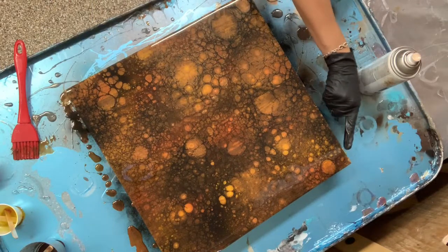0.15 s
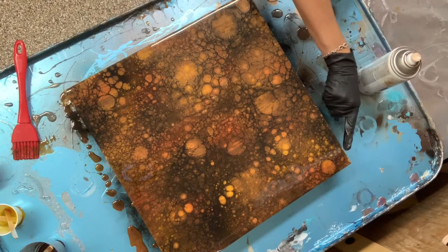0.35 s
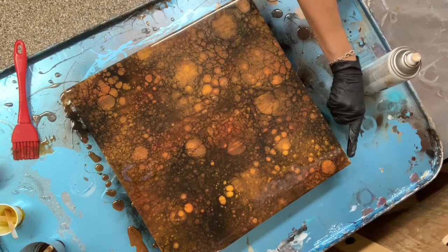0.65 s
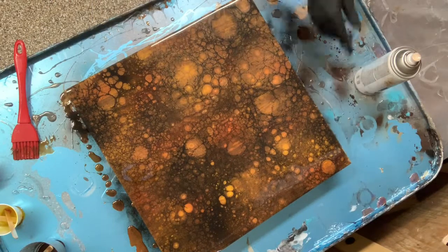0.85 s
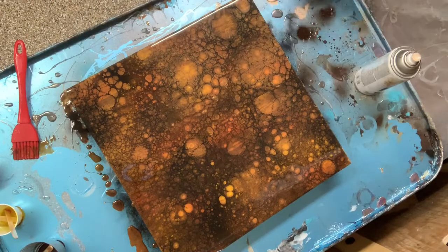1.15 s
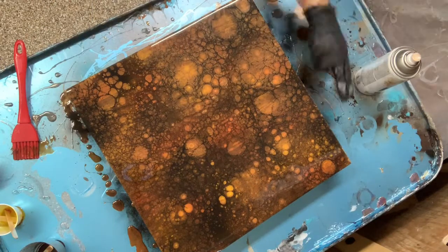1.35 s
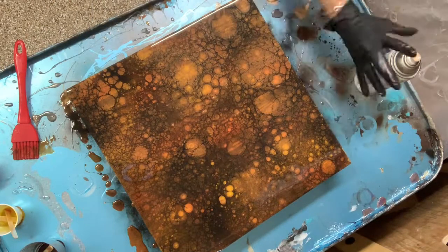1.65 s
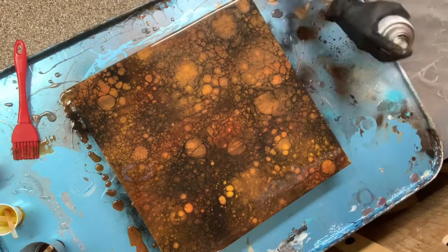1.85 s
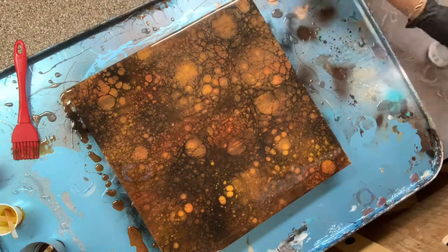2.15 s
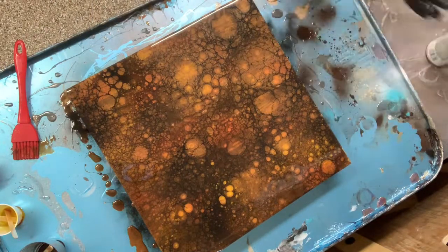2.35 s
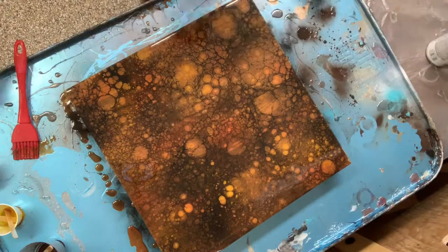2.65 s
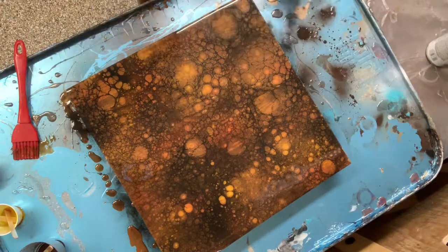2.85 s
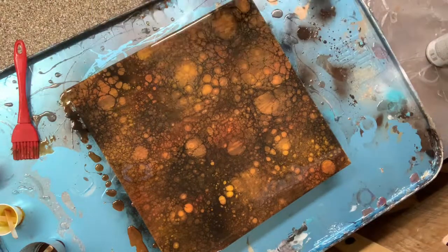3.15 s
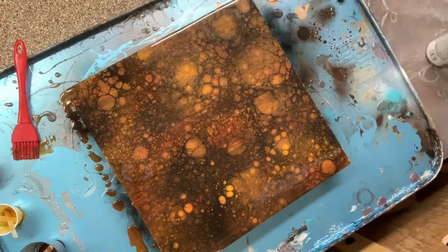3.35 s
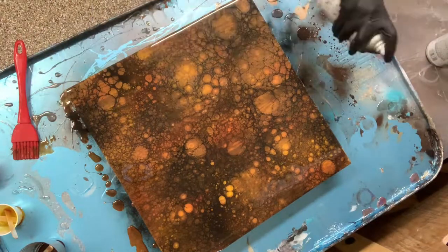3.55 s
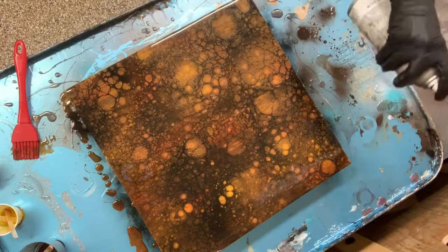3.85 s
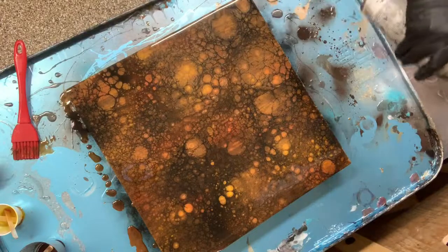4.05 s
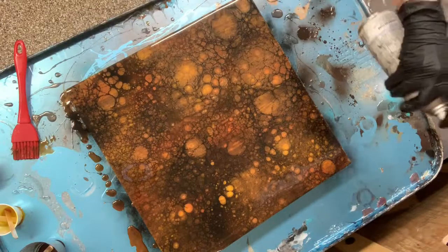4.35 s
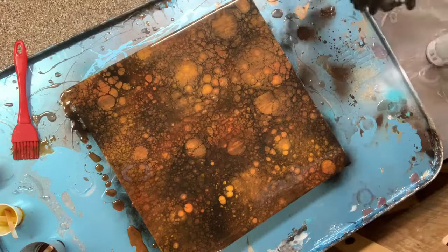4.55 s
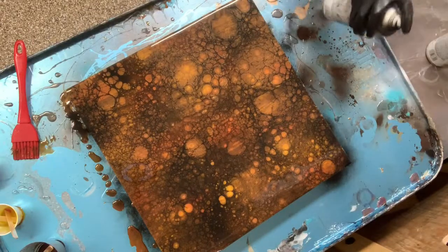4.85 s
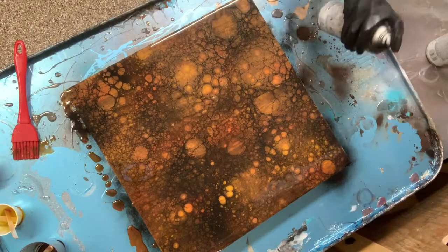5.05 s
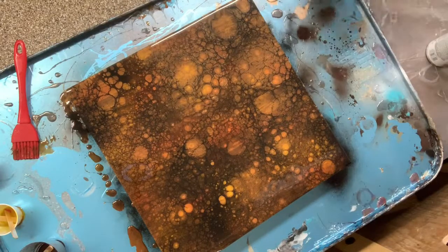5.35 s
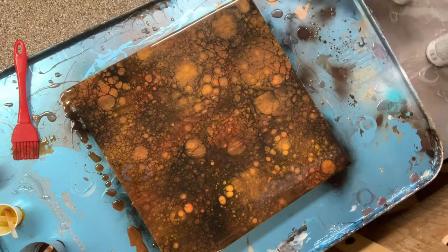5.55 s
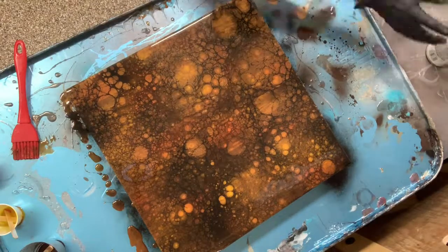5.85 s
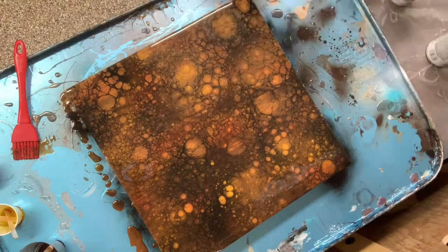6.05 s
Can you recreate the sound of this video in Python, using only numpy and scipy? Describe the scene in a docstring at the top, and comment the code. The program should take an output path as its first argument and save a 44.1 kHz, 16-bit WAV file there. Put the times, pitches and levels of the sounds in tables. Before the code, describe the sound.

Under a deep, slowly beating motor hum, a glove brushes and grabs a metal can, which lands with a muffled hollow triple knock. Light scuffs follow. Then come sputtering, bright aerosol spurts with quick metallic ball ticks at first, settling into evenly spaced puffs. A harder, resonant thunk of can on bench ends the action, with soft bumps afterwards. Near microphones, short diffuse room reverberation.

```python
"""Aerosol cans on a workbench

A gloved hand moves aerosol cans about a plastic paint tray: filtered-noise scuffs, rubs and tray bumps.
One can is grabbed and stood down with a hollow knock of ringing bench modes. Another rattles its mixing
ball (resonant noise bursts), gives a row of hissing puffs (shaped noise) and is stood down hard.
Two beating sines hum low beneath. The right microphone port hears the can a little late.
"""
import sys
import numpy as np
from scipy import signal
from scipy.fft import rfft, irfft, next_fast_len
from scipy.io import wavfile
from scipy.ndimage import map_coordinates

SR = 44100
rng = np.random.default_rng(int(sys.argv[2]) if len(sys.argv) > 2 else 0)


def generate_wav(sig):
    """Save sig (samples, or channels by samples) to the path in sys.argv[1] as 16-bit PCM at SR."""
    pcm = np.round(np.clip(np.atleast_2d(sig).T, -1, 1) * 32767).astype(np.int16)
    wavfile.write(sys.argv[1], SR, pcm)


N = 273861

# Colour tables give relative levels. Likeness: left-right, 0 unrelated to 1 identical.

# valve presses, weak ones only dribble: open [s], hold [s], jet_level [dB], mist_level [dB]
PUFFS = [(3.226, .008, -49.5, -55.5), (3.262, 0.15, -62.5, -55.5), (3.403, 0.0063, -41.5, -43.5),
         (3.436, 0.1, -54.5, -54), (3.592, 0.028, -46.5, -50), (3.752, 0.042, -43.5, -51.5),
         (3.836, 0.016, -65, -57), (3.993, 0.056, -43, -49.5), (4.09, 0.021, -59.5, -57),
         (4.254, 0.057, -43, -49), (4.45, 0.05, -42.5, -52.5), (4.559, 0.042, -64.5, -58),
         (4.76, 0.05, -42, -53.5), (4.962, 0.033, -42, -53), (5.157, 0.037, -43, -54)]
# nozzle jet colour: freq [Hz], level [dB]
JET_COLOUR = [(1500, -39), (4000, -12), (6500, 2.5), (8500, 2), (11000, 6), (13500, 3), (15800, 2)]
# colour of mist striking the tray: freq [Hz], level [dB]
MIST_COLOUR = [(300, -20), (700, -8.5), (1300, -2.5), (2000, 1), (2700, 2.5), (3300, 0), (4500, 1.5),
               (6500, -10.5), (9000, -10), (15000, -57)]
# hiss bouncing off tray and canvas: nominal_delay [s], level [dB]
TRAY_ECHOES = [(.0021, -12), (.0036, -11), (.0055, -7.5)]
# lag of the right port behind the left: freq [Hz], lag [s]
PORT_LAG = [(1000, .0001), (3500, .00029), (5700, .000351), (8200, .000366), (10700, .000374),
            (13150, .00038), (15600, .000385)]
# mixing ball strikes: time [s], relative_level [dB]
BALL_HITS = [(3.228, -33.5), (3.2644, -34.5), (3.2829, -32), (3.3977, -31.5), (3.4078, -26), (3.445, -26),
             (3.4555, -29), (3.4694, -30), (3.5018, -36), (3.5768, -36), (3.8144, -31.5)]
# steel wall resonances: freq [Hz], width [Hz], level [dB]
CAN_MODES = [(1050, 170, -10.5), (2180, 200, -7.5), (2580, 110, -4), (3700, 180, -4), (4320, 180, 1),
             (4460, 97, 5.5), (6540, 320, 2), (7200, 71, -13), (8250, 700, -7), (10350, 300, -2),
             (10100, 390, -25), (13400, 400, -18)]
# can meets bench: time [s], blow_level [dB], rim [0 flat, 1 rim], bright [Hz], crack_level re blow [dB]
KNOCKS = [(2.258, -25, .15, 900, -20.5), (2.269, -26, 0.39, 930, -13), (2.281, -25, 0.46, 784, -27),
          (2.330, -35.5, 0.04, 790, -25), (2.353, -37.5, 0.51, 820, -32), (5.6248, -23, .05, 1250, -24),
          (5.631, -18, 0.22, 1450, -25.5), (5.6353, -14, 0.61, 1500, -19.5),
          (5.655, -26.5, 0.95, 1450, -19), (5.727, -39, .45, 1440, -33.5)]
# bench and tray ringing together: freq [Hz], level [dB], t60 [s]
BENCH_MODES = [(88, -25, 0.4), (166, -7, 0.082), (181.2, -2.5, 0.27), (262.6, -11.5, 0.19), (284, -11, 0.2),
               (345, -15, 0.15), (377.5, -8.5, 0.25), (448.5, -3.5, 0.3), (476, -6, 0.16), (544, 4, 0.23),
               (620.5, -9.5, 0.3), (732, -17, 0.35), (798, -14.5, 0.17), (810, -10.5, .2),
               (894, -12.5, 0.25), (942, -16, 0.18), (985, -12.5, 0.11), (1050, -11.5, 0.11),
               (1180, -22, 0.18), (1272, -21.5, .24), (1386, -22.5, 0.32)]
# dull thud colour: freq [Hz], level [dB]
THUD_COLOUR = [(50, -24.5), (125, -28), (178, 4), (230, -7.5), (310, -11.5), (450, 3), (700, -5.5),
               (950, -3.5), (1250, -11), (1480, -6.5), (1700, -14), (4000, -12.5)]
# contact crack colour: freq [Hz], level [dB]
CRACK_COLOUR = [(600, 4), (1500, -5), (2300, 4.5), (3000, -7), (4200, 5), (5500, -5), (8500, -10.5),
                (12000, -16), (15500, -25)]
# rim grazes just before landing: peak_time [s], level [dB], centre [Hz]
GRAZES = [(2.25, -45, 510), (5.612, -35, 804)]
# can nudges tray: time [s], level [dB], fade [s]
BUMPS = [(2.919, -47, 0.4), (2.96, -39.5, 0.21), (5.76, -35, 0.2), (5.825, -32.5, 0.27), (5.888, -40, .28)]
# plastic tray resonances: freq [Hz], width [Hz], level [dB]
TRAY_MODES = [(181, 18, 10), (196, 21, -2.5), (308, 66, -6), (463, 27, -1.5), (486, 160, -14.5)]
# colour of the first grab: freq [Hz], width [Hz], level [dB]
GRAB_MODES = [(1030, 190, 13.5), (2430, 4200, 2), (6030, 8600, -8), (12700, 700, -5)]
# glove and can scuffs: peak_time [s], level [dB], centre [Hz], width [octaves]
SCUFFS = [(1.185, -71.5, 4360, 0.63), (1.30, -75, 3000, 0.66), (1.65, -77, 5360, .074),
          (1.862, -71, 8300, .12), (1.967, -64.5, 6760, 0.43), (2.093, -66.5, 4900, 0.66),
          (2.535, -76, 7960, 0.27), (2.62, -64, 1380, 0.5), (2.67, -78, 8000, .24), (2.941, -67, 5000, 0.8),
          (3.05, -77, 6500, .69), (3.228, -51, 860, 1.26), (5.833, -55.5, 2550, .73),
          (5.868, -54, 1830, 0.69)]
# glove sliding along a can: start [s], hold [s], level [dB]
RUBS = [(0.88, 0.41, -78), (1.468, .12, -79.5), (1.622, 0.075, -74.5), (2.746, 0.038, -63),
        (2.864, 0.39, -77.5), (5.44, 0.12, -70), (6.092, 0.063, -73)]
# glove rub colour: freq [Hz], level [dB]
GLOVE_COLOUR = [(500, -9), (1200, 4.5), (2500, -0.5), (4400, 1), (6000, -7.5), (8000, -19.5),
                (15000, -31.5)]
# workshop reverberation: freq [Hz], t60 [s]
ROOM_T60 = [(150, 0.12), (550, 0.36), (1300, 0.26), (3000, 0.31), (8000, 0.26), (15000, 0.077)]
# humming motors, close in speed: freq [Hz], level [dB]
MOTORS = [(58.68, -41.4), (53.56, -57.5)]
# faint hum overtones: freq [Hz], level [dB], pitch_wander [Hz]
OVERTONES = [(108, -67.5, 3.8), (177.8, -64, 2.932), (236, -67, 3.02), (282.7, -66.5, 3.97),
             (362.6, -68.5, 1.4), (411, -75, 2.4)]
# passing faint tone: start [s], hold [s], level [dB], pitch [Hz], glide [Hz/s]
TONES = [(1.683, 0.425, -60.5, 282.6, 24.8), (3.14, .08, -64, 282, 19)]
# dull room noise colour: freq [Hz], level [dB]
AIR_COLOUR = [(20, -4), (45, 4), (90, 3), (180, -1), (350, -5), (500, -13), (900, -20), (1500, -29.5),
              (2050, -33), (2700, -40), (4200, -38), (5500, -44), (9000, -47), (15000, -46.5)]
# narrow bands in the room noise: freq [Hz], width [Hz], level [dB]
WHINE_MODES = [(504, 40, 11), (989, 56, 3), (2088, 37, -1), (3750, 70, -4.5), (4470, 80, -10),
               (6600, 200, -21), (8400, 330, -16.5)]
# likeness of diffuse sound: freq [Hz], likeness
DIFFUSE_ALIKE = [(60, 1), (130, 0.89), (290, 0.67), (640, 0.36), (1400, 0.45), (3000, 0.27), (15000, 0.11)]
# likeness of each source: freq [Hz], likeness
JET_ALIKE = [(3000, 0.1), (8000, 0.93), (14000, 1.0)]
MIST_ALIKE = [(700, 1.0), (2000, 0.23), (6000, 0.12)]
WALL_ALIKE = [(2000, 0.2), (10000, 0.43)]
THUD_ALIKE = [(100, 1.0), (400, 0.98), (1400, 0.48)]
CRACK_ALIKE = [(2000, 0.11), (9000, 0.92)]
GRAZE_ALIKE = [(1000, 1.0)]
TRAY_ALIKE = [(150, 0.99), (500, 1.0)]
TOUCH_ALIKE = [(1000, 0.74), (4000, 0.14), (9000, 1.0)]

# every rise and fade is the time for 60 dB
JET_RISE_S, JET_FADE_S = 0.075, 0.14
MIST_RISE_S, MIST_FADE_S = 0.097, 0.22
MIST_FLIGHT_S = 0.0028  # nozzle to tray
SAG_DB_PER_S = 23  # pressure drop while the valve is open
VALVE_EASE = 1.1  # above 1 rounds the shoulders of the jet
MIST_PATCHY_DB, MIST_PATCH_HZ = 2, 460  # each puff lands on another spot with its own colour
MIST_SPATTER_DB = 1.2  # droplets arrive in clumps
BALL_RING_S, BALL_DETUNE = 0.23, 0.014  # detune: log pitch scatter
FLAT_RING_DB, RIM_RING_DB = -15, 0.5  # the rim sets the bench ringing
FLAT_BASS_DB, RIM_BASS_DB = 10, -10  # the flat base pushes it
BASS_HZ, BASS_WIDTH_HZ = 195, 57  # bench boom
PUSH_DB, PUSH_S = 6.5, 0.00052  # single shove of a contact, half width
GRAZE_OCTAVES, GRAZE_RISE_S, GRAZE_FADE_S = 0.34, 0.1, 0.1
GRAB_S, GRAB_DB, GRAB_RISE_S, GRAB_FADE_S = 1.803, -47.5, 0.079, 0.24
GRAB_TAP_S, GRAB_TAP_DB = 1.7975, -45  # a fingertip lands first
SCUFF_RISE_S, SCUFF_FADE_S = 0.16, 0.21
RUB_RISE_S, RUB_FADE_S = 0.44, 0.5
IN_STEP_S = 0.152  # the two motors swell together
HUM_WAVER_DB, HUM_WANDER_HZ = -0.06, 0.6
TONE_RISE_S, TONE_FADE_S = 1, 1.2
TOP_HZ = 15780


def amp(db):
    """Decibels to gain."""
    return 10 ** (np.asarray(db) / 20)


def unit(x):
    """x at rms 1."""
    return x / np.sqrt(np.mean(x ** 2) + 1e-20)


def along(points, hz):
    """(Hz, value) points interpolated on a log frequency axis."""
    f, v = np.transpose(points)
    return np.interp(np.log(hz + 1), np.log(f + 1), v)


def wobble(rate_hz):
    """Smooth random curve, rate_hz knots a second."""
    knots = rng.standard_normal(int(N * rate_hz / SR) + 4)
    return map_coordinates(knots, [np.arange(N) * rate_hz / SR])


def filtered(x, response):
    """x times a response of frequency."""
    n = x.shape[-1]
    m = next_fast_len(n + 8192)
    return irfft(rfft(x, m) * response(np.fft.rfftfreq(m, 1 / SR)), m)[..., :n]


def noise(colour, alike, size=N):
    """Stereo noise of rms 1; colour gives dB, alike sets the mid-side balance by frequency."""
    def mid_side(hz):
        turn = np.arccos(np.clip(along(alike, hz), -1, 1)) / 2
        return amp(colour(hz)) * [np.cos(turn), np.sin(turn)]

    mid, side = filtered(rng.standard_normal((2, size)), mid_side)
    return unit(np.array([mid + side, mid - side]))


def shaped(points):
    """Colour of a (Hz, dB) table."""
    return lambda hz: along(points, hz)


def peaked(modes):
    """Colour of (Hz, width Hz, dB) resonances with steep skirts."""
    def colour(hz):
        power = sum(amp(db) ** 2 / (1 + ((hz - centre) / width) ** 2) ** 2 for centre, width, db in modes)
        return 10 * np.log10(power)

    return colour


def band(centre_hz, octaves):
    """Colour of one broad hump."""
    return lambda hz: -10 * np.log10(1 + (np.log2((hz + 1) / centre_hz) / octaves) ** 4)


def patches(depth_db, width_hz):
    """Random, smoothly uneven response of frequency."""
    knots = rng.standard_normal(256)
    return lambda hz: amp(depth_db * map_coordinates(knots, [hz / width_hz], mode="mirror"))


def ports(x):
    """Direct sound reaches the left port first: half the lag as lead left, half as delay right."""
    lead = np.array([[1], [-1]])
    return filtered(x, lambda hz: np.exp(1j * np.pi * hz * along(PORT_LAG, hz) * lead))


def swell(t, rise_s, fade_s):
    """Gain climbing 60 dB in rise_s up to t = 0, then falling 60 dB in fade_s."""
    return amp(-60 * np.maximum(-t / rise_s, t / fade_s))


def held(t, hold_s, rise_s, fade_s, ease=1):
    """Swell with a hold at the top; ease bends its slopes."""
    away = t - np.clip(t, 0, hold_s)
    return amp(-60 * np.abs(np.maximum(-away / rise_s, away / fade_s)) ** ease)


def add(track, start_s, sound):
    """Mix a sound in at start_s."""
    part = track[:, round(start_s * SR):][:, :sound.shape[-1]]
    part += sound[..., :part.shape[-1]]


def spray():
    """Each valve press opens a bright jet; droplets spatter on the tray with a duller rush."""
    out, t = np.zeros((2, N)), np.arange(-SR // 8, SR // 3) / SR
    for open_s, hold_s, jet_db, mist_db in PUFFS:
        pressure = amp(-SAG_DB_PER_S * np.clip(t, 0, hold_s))
        jet = amp(jet_db) * held(t, hold_s, JET_RISE_S, JET_FADE_S, VALVE_EASE)
        jet = jet * noise(shaped(JET_COLOUR), JET_ALIKE, size=len(t))
        mist = amp(mist_db) * held(t - MIST_FLIGHT_S, hold_s, MIST_RISE_S, MIST_FADE_S)
        mist = mist * noise(shaped(MIST_COLOUR), MIST_ALIKE, size=len(t))
        mist = filtered(mist, patches(MIST_PATCHY_DB, MIST_PATCH_HZ))
        mist = mist * amp(MIST_SPATTER_DB * wobble(160)[:len(t)])
        mist = mist * amp([[-0.8], [0.8]])  # leans right
        # the hand moves between puffs, so the echoes comb each one anew
        echoes = [(delay_s * np.exp(0.093 * rng.standard_normal()), db) for delay_s, db in TRAY_ECHOES]
        comb = lambda hz: 1 + sum(amp(db) * np.exp(-2j * np.pi * hz * delay_s) for delay_s, db in echoes)
        add(out, open_s + t[0], filtered(pressure * (jet + mist), comb))
    flicker = amp(0.9 * wobble(600))
    return ports(out * flicker)


def ball():
    """The mixing ball skitters on the steel wall, muffled by paint; each spot rings a little differently."""
    out, t = np.zeros((2, N)), np.arange(-SR // 30, SR // 4) / SR
    for hit_s, hit_db in BALL_HITS:
        modes = []
        for hz, width_hz, db in CAN_MODES:
            spot_hz = hz * np.exp(BALL_DETUNE * rng.standard_normal())
            modes.append((spot_hz, width_hz, db + 3 * rng.standard_normal()))
        tick = 0.9 * swell(t, 0.0035, 0.012) * rng.standard_normal((2, len(t)))
        wall = swell(t, 0.06, BALL_RING_S) * noise(peaked(modes), WALL_ALIKE, size=len(t))
        add(out, hit_s + t[0], amp(hit_db - 14.5) * (wall + tick))
    return ports(out)


def ring(modes, hit_s, t, rise_s, scatter_db, spread):
    """Struck modes, in step from blow to blow, with fresh strengths and a phase of their own at each port."""
    hz, db, t60_s = np.transpose(modes)[:, :, None]
    size = amp(db + scatter_db * rng.standard_normal(hz.shape)) * swell(t, rise_s, t60_s)
    skew = spread * np.sqrt(hz / hz.max()) * rng.standard_normal(hz.shape)
    phase = 2 * np.pi * hz * (hit_s + t)
    return np.array([(size * np.sin(phase + side * skew)).sum(0) for side in (1, -1)])


def knocks():
    """The can's rim grazes, lands and rocks on the hollow bench: modes, shove, thud and crack."""
    out, t = np.zeros((2, N)), np.arange(-SR // 12, SR // 2) / SR
    for hit_s, blow_db, rim, bright_hz, crack_db in KNOCKS:
        ring_db = np.interp(rim, [0, 1], [FLAT_RING_DB, RIM_RING_DB])
        bass_db = np.interp(rim, [0, 1], [FLAT_BASS_DB, RIM_BASS_DB])
        modes = ring(BENCH_MODES, hit_s, t, rise_s=0.063, scatter_db=1.7, spread=0.55)
        modes = amp(ring_db - 2) * modes
        thud = amp(0.5) * noise(shaped(THUD_COLOUR), THUD_ALIKE, size=len(t))
        thud = thud * (swell(t, 0.0032, 0.052) + 0.58 * swell(t, 0.078, 0.29))
        push = amp(PUSH_DB) * (2 * (t / PUSH_S) ** 2 - 1) * np.exp(-(t / PUSH_S) ** 2)

        # a softer landing leaves the high modes quiet; the bass depends on how flat the can lands
        def landing(hz):
            bass = amp(bass_db / (1 + ((hz - BASS_HZ) / BASS_WIDTH_HZ) ** 4))
            return bass / np.sqrt(1 + (hz / bright_hz) ** 10)

        body = filtered(modes + push + thud, landing)
        snap = 1.4 * swell(t, 0.0017, 0.009)
        buzz = 0.42 * swell(t, 0.093, 0.074)
        tail = 0.38 * swell(t, 0.072, 0.34)
        crack = noise(shaped(CRACK_COLOUR), CRACK_ALIKE, size=len(t)) * (snap + buzz + tail)
        add(out, hit_s + t[0], amp(blow_db) * (body + amp(crack_db - 5) * ports(crack)))
    for peak_s, db, centre_hz in GRAZES:
        scrape = noise(band(centre_hz, GRAZE_OCTAVES), GRAZE_ALIKE, size=len(t))
        add(out, peak_s + t[0], amp(db) * swell(t, GRAZE_RISE_S, GRAZE_FADE_S) * scrape)
    return out * amp([[-0.7], [0.7]])  # leans right


def bumps():
    """The plastic tray judders softly in its low resonances."""
    out, t = np.zeros((2, N)), np.arange(-SR // 30, SR // 3) / SR
    for bump_s, db, fade_s in BUMPS:
        judder = noise(peaked(TRAY_MODES), TRAY_ALIKE, size=len(t))
        add(out, bump_s + t[0], amp(db) * swell(t, 0.026, fade_s) * judder)
    return out


def handling():
    """The glove grabs the cans, slides and scuffs on them in fine stick-slip grains."""
    out, t = np.zeros((2, N)), np.arange(-SR // 8, SR // 4) / SR
    touch = lambda colour: noise(colour, TOUCH_ALIKE, size=len(t))
    grab = swell(t, GRAB_RISE_S, GRAB_FADE_S) * touch(peaked(GRAB_MODES))
    add(out, GRAB_S + t[0], amp(GRAB_DB) * grab)
    tap = swell(t, 0.0046, 0.047) * touch(peaked(GRAB_MODES))
    add(out, GRAB_TAP_S + t[0], amp(GRAB_TAP_DB) * tap)
    for peak_s, db, centre_hz, octaves in SCUFFS:
        scuff = swell(t, SCUFF_RISE_S, SCUFF_FADE_S) * touch(band(centre_hz, octaves))
        add(out, peak_s + t[0], amp(db) * scuff)
    time_s = np.arange(N) / SR
    rub_gain = sum(amp(db) * held(time_s - start_s, hold_s, RUB_RISE_S, RUB_FADE_S)
                   for start_s, hold_s, db in RUBS)
    rubbing = rub_gain * noise(shaped(GLOVE_COLOUR), DIFFUSE_ALIKE)
    grains = amp(1.1 * wobble(400))
    return (ports(out) + rubbing) * grains


def room(x):
    """The workshop's short, diffuse answer: noise decaying at its own rate in each band."""
    hz, t, grid = signal.stft(rng.standard_normal((2, SR // 2)), SR, nperseg=256)
    decay = amp(-60 * t / along(ROOM_T60, hz)[:, None])
    tail = signal.istft(grid * decay, SR, nperseg=256)[1]
    return signal.fftconvolve(x, tail / np.linalg.norm(tail[0]), axes=1)[:, :N]


def background():
    """Two beating motors with weak overtones and a faint passing tone, over dull room noise."""
    t = np.arange(N) / SR
    tone = lambda hz: np.sqrt(2) * np.sin(2 * np.pi * np.cumsum(hz) / SR)
    drift = np.cumsum(HUM_WANDER_HZ * wobble(16)) / SR  # cycles, shared by both motors
    hum = sum(amp(db) * np.sqrt(2) * np.sin(2 * np.pi * (hz * (t - IN_STEP_S) + drift)) for hz, db in MOTORS)
    hum = hum * amp(HUM_WAVER_DB * wobble(8))
    for hz, db, wander_hz in OVERTONES:
        hum = hum + amp(db + 2.2 * wobble(8.3)) * tone(hz + wander_hz * wobble(9))
    for start_s, hold_s, db, hz, glide_hz_per_s in TONES:
        gain = amp(db) * held(t - start_s, hold_s, TONE_RISE_S, TONE_FADE_S)
        hum = hum + gain * tone(hz + glide_hz_per_s * np.clip(t - start_s, 0, hold_s))
    whine = amp(-74.5 + 1.4 * wobble(29)) * noise(peaked(WHINE_MODES), DIFFUSE_ALIKE)
    air = amp(-55.5) * noise(shaped(AIR_COLOUR), DIFFUSE_ALIKE)
    return hum + air + whine


def scene():
    """Cans, bench and hum in the workshop."""
    can = spray() + ball() + handling()
    bench = knocks() + bumps()
    reverb = room(amp(-17) * can + amp(-11.5) * bench)
    return can + bench + reverb + background() * amp([[-0.2], [0.2]])


def record(dry):
    """Low-pass with a 200 Hz wide linear slope centred on TOP_HZ."""
    return filtered(dry, lambda hz: np.clip((TOP_HZ - hz) / 200 + 0.5, 0, 1))


dry = scene()
out = record(dry)
generate_wav(out)
```